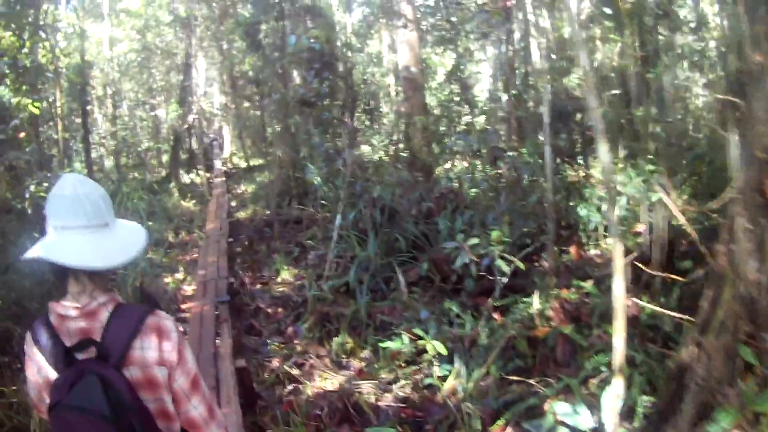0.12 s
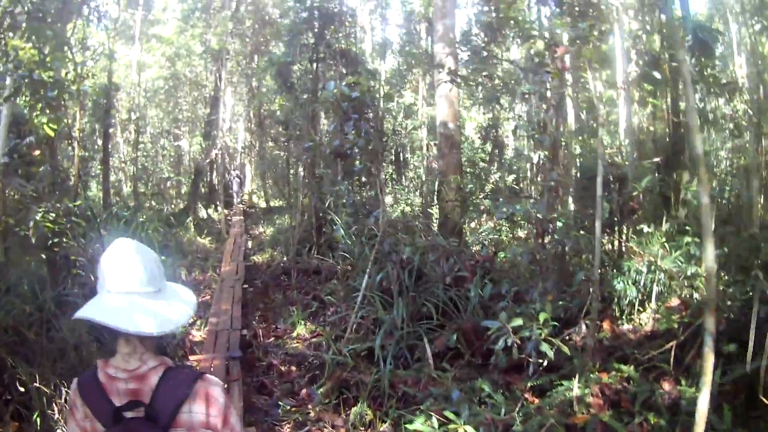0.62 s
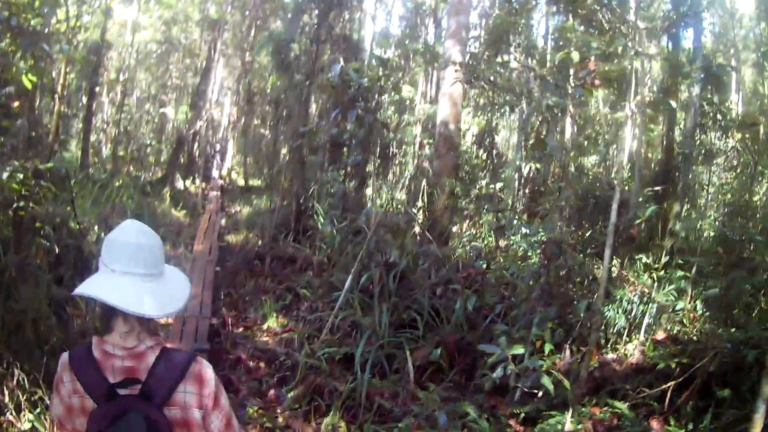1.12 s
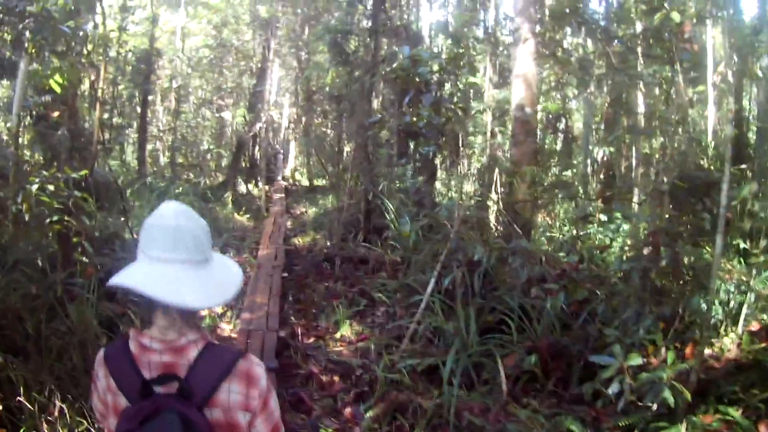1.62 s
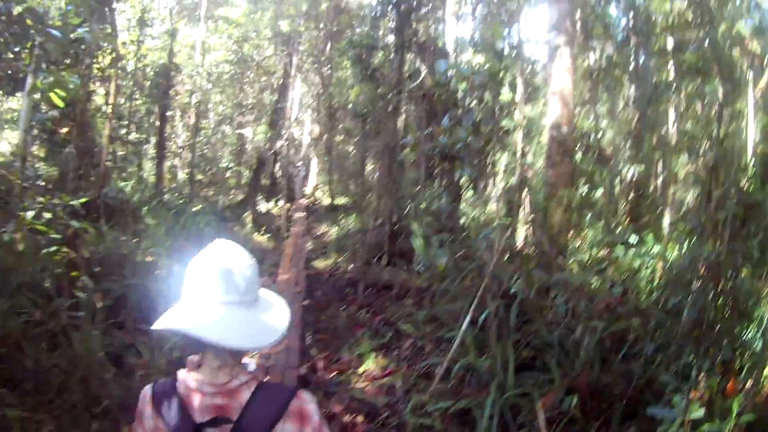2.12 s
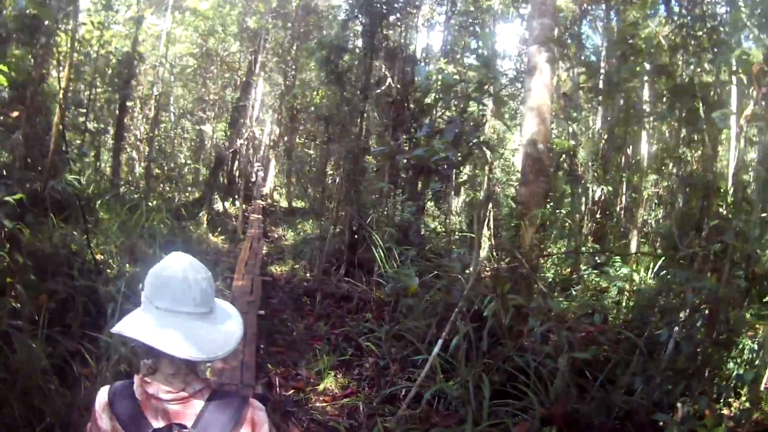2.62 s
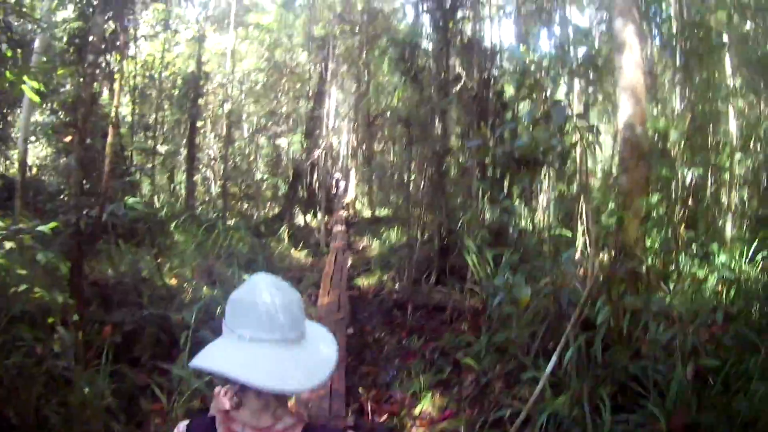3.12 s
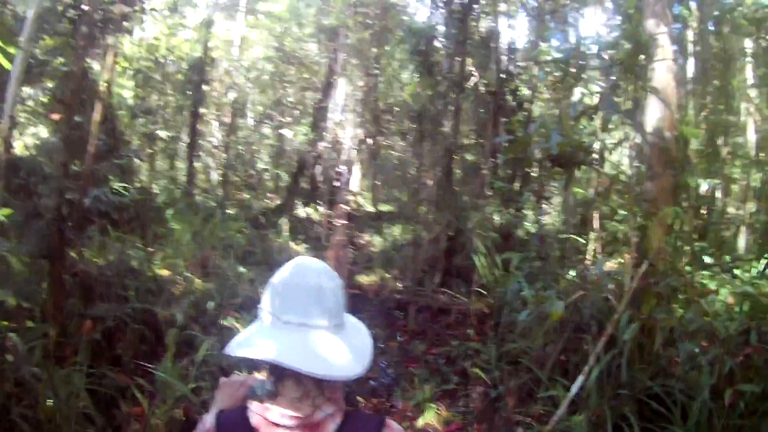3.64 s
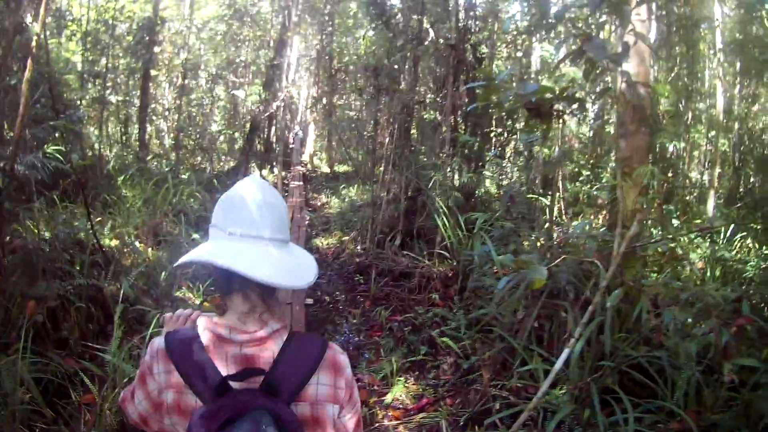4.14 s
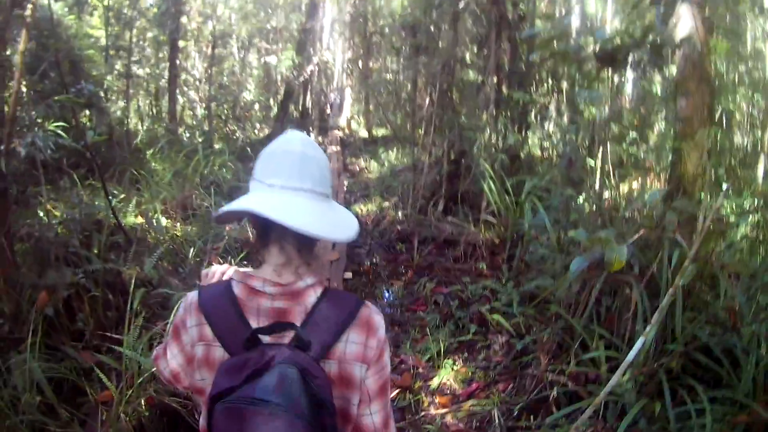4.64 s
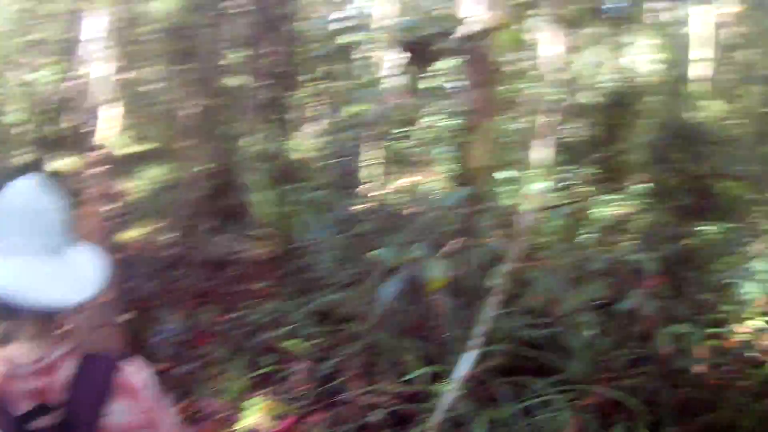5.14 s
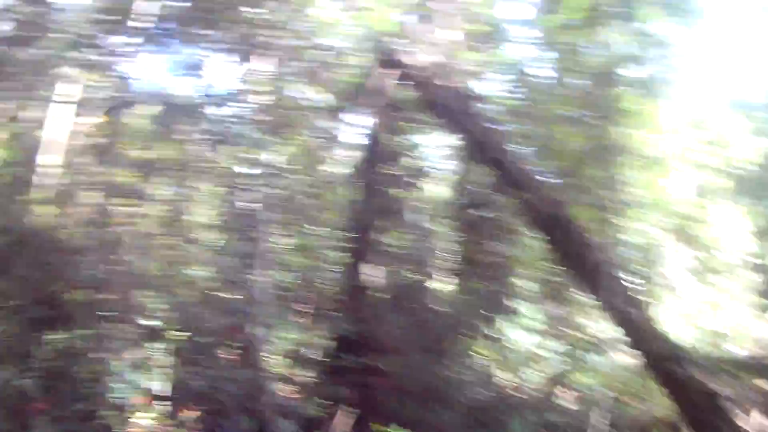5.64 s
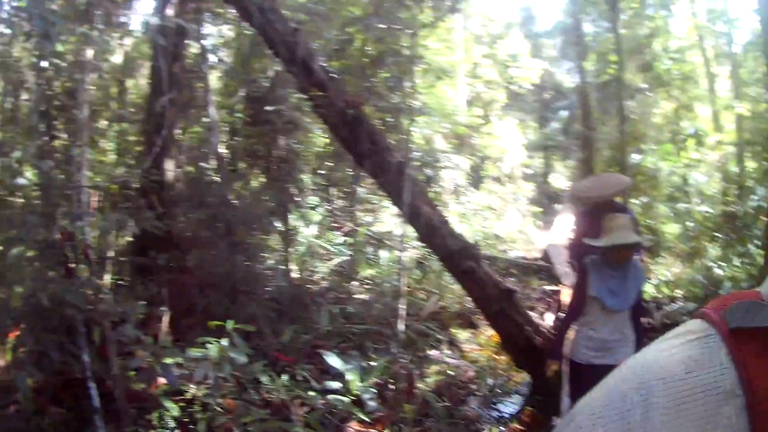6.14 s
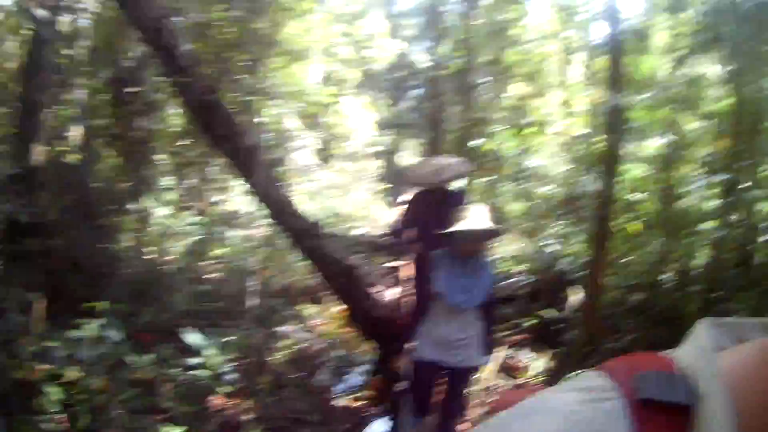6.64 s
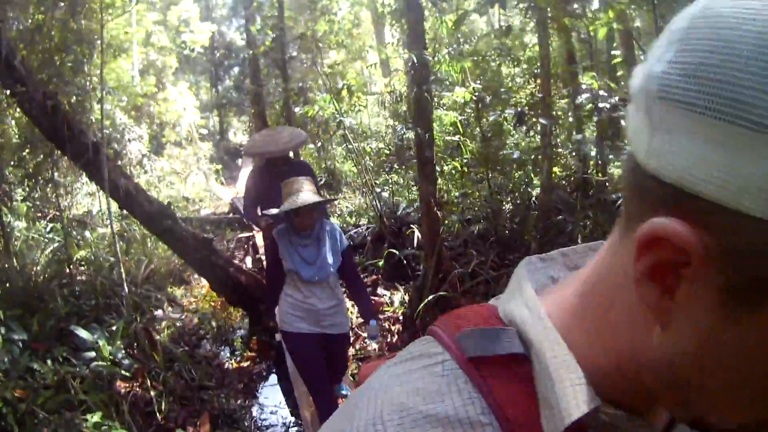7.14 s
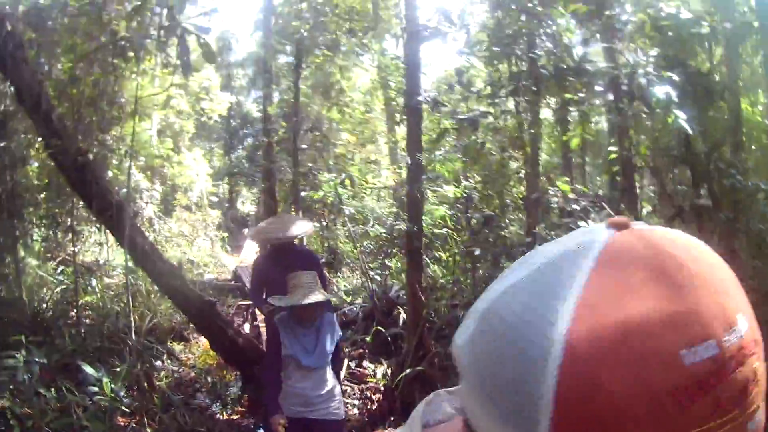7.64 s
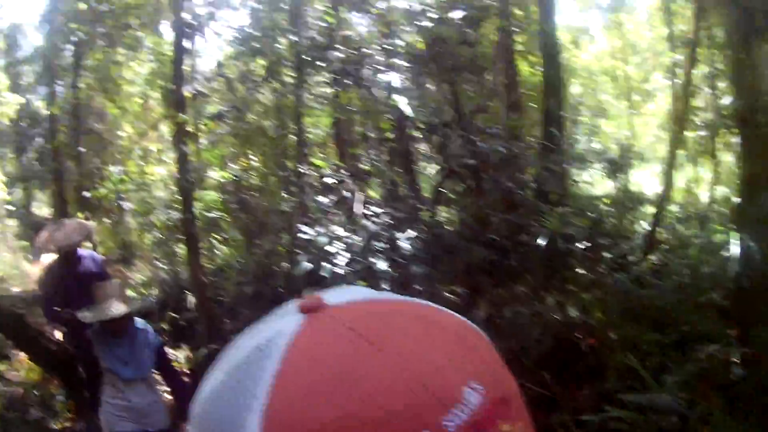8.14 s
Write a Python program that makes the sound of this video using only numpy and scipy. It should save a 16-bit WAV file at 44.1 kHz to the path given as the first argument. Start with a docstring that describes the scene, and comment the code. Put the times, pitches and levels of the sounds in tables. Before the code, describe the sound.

Very close, boxed-in mono sound, treble dulled by a closed case. Over a dim forest background, a hand slips softly and a loose plastic joint clicks irregularly, often in quick pairs. Midway, loud clunks burst out with gritty snapping, low pole thuds and scraping grip. A brief lull follows, then another stronger run of knocks and rattles, the loudest slightly crushed with a little hiss.

```python
"""A muffled forest hush and low rumble, made of coloured noise, lie under the whole scene.
Soon a hand slips on a pole carrying a small camera in a closed plastic case, and its loose joint
clicks: decaying modes of tube, case and lid, with gritty noise as the joint faces snap.
From the middle on the pole is swung round: filtered grains rub under the hand, low bending modes
sway, and the knocks grow heavy. The loudest peaks saturate; a treble noise follows the loudness."""
import sys
import numpy as np
from scipy import signal
from scipy.fft import rfft, irfft, next_fast_len
from scipy.io import wavfile
from scipy.ndimage import uniform_filter1d, map_coordinates

SR = 44100
rng = np.random.default_rng(int(sys.argv[2]) if len(sys.argv) > 2 else 0)


def gain_from_db(level_db):
    """Turn a decibel level (scalar or array-like) into a linear amplitude factor."""
    decades = np.asarray(level_db, float) / 20
    return 10 ** decades


def generate_wav(sig):
    """Save sig (samples, or channels by samples) to the path in sys.argv[1] as 16-bit PCM at SR."""
    pcm = np.round(np.clip(np.atleast_2d(sig).T, -1, 1) * 32767).astype(np.int16)
    wavfile.write(sys.argv[1], SR, pcm)


N = 364707  # length [samples]


def unit(x):
    """Scales a signal to rms 1."""
    return x / np.sqrt(np.mean(x ** 2) + 1e-20)


def along(points, hz):
    """Reads a (frequency [Hz], value) curve on a log frequency axis."""
    f, v = np.transpose(points)
    return np.interp(np.log(hz + 1), np.log(f + 1), v)


def wobble(rate):
    """A smooth random curve with `rate` knots a second."""
    knots = rng.standard_normal(int(N * rate / SR) + 4)
    return map_coordinates(knots, [np.arange(N) * rate / SR])


def filtered(x, response):
    """Multiplies the spectrum of x by a response of frequency."""
    m = next_fast_len(N + SR // 2)
    return irfft(rfft(x, m) * response(np.fft.rfftfreq(m, 1 / SR)), m)[:N]


def noise(spectrum):
    """Noise of rms 1 with the given colour."""
    white = rng.standard_normal(N)
    return unit(filtered(white, lambda hz: gain_from_db(along(spectrum, hz))))


def ringing(modes, s, level_db, attack, scatter_db, bounce_db, gap=0.00455, free_db=-60):
    """Every blow adds a ring of slightly random strength to each mode, then a rebound at a fixed ratio."""
    t = np.arange(SR // 2) / SR
    luck = rng.standard_normal((len(s), len(modes) + 1))
    start = np.round(s * SR).astype(int)
    uneven_gap = gap * gain_from_db(2.577 * luck[:, -1])
    again = start + np.round(SR * uneven_gap).astype(int)
    out = np.zeros(N)
    for (hz, db, t60), chance in zip(modes, luck.T):
        size = gain_from_db(level_db + scatter_db * chance)
        rebounds = np.bincount(again, size, N + SR)[:N]
        blows = np.bincount(start, size, N) + gain_from_db(bounce_db) * rebounds
        # light touches stay pressed and die twice as fast
        firm = np.clip(np.abs(blows) / gain_from_db(free_db), 0, 1)
        for share, life in ((firm, t60), (1 - firm, t60 / 2)):
            onset = (1 - np.exp(-t / attack)) ** 2
            ring = gain_from_db(db - 60 * t / life) * onset * np.sin(2 * np.pi * hz * t)
            out += signal.oaconvolve(blows * share, ring)[:N]
    return out


def strokes(start, end, level_db, rise, fall):
    """Gain of strokes that swell, hold and fade by straight slopes [dB/s], summed as power."""
    t = np.arange(0, N + 64, 64)[:, None] / SR
    early = np.maximum(start - t, 0)
    late = np.maximum(t - end, 0)
    gain = gain_from_db(level_db - rise * early - fall * late)
    return np.interp(np.arange(N) / SR, t[:, 0], np.sqrt(np.sum(gain ** 2, axis=1)))


# Joint contacts: (time [s], knock before the losses of each part [dB], side struck, crack [dB], push [dB])
# The side runs round a circle of three: 0 tube, 1 case, 2 lid, 3 tube again.
JOINT_CONTACTS = [(0.737, -31.5, 2, -43, -38), (0.7436, -37, 0.99, -48, -35), (0.9575, -27, 0.78, -56, -40),
                  (1.1206, -28.5, 2.33, -39, -69), (1.123, -39, 0.84, -44, -61),
                  (1.2006, -32.5, 2.91, -31.0, -31), (1.206, -30, 2.16, -62.0, -32),
                  (1.304, -42, 2.01, -53.5, -69.0), (1.4984, -26.5, 2.45, -60.0, -37),
                  (1.5441, -30.5, 0.24, -29.5, -40), (1.895, -35, 2.56, -64.0, -42.0),
                  (1.9454, -31.5, 2.26, -40.0, -34), (1.951, -26, 2.1, -38.5, -32),
                  (2.093, -24, 1.4, -32.5, -35), (2.2064, -26, 1.37, -34.5, -33),
                  (2.2112, -29.5, 1.86, -45, -31.5), (2.3723, -27, 1.24, -33.5, -45),
                  (2.454, -34, 1, -34.5, -28.5), (2.4607, -27.5, 2.3, -48, -53),
                  (2.564, -58.5, 0.21, -54, -54.0), (2.7729, -58.5, 2.21, -51, -60.0),
                  (3.0108, -55, 1.9, -50.5, -65.0), (3.0572, -26, 2.71, -28, -40),
                  (3.161, -19.5, 2.3, -44, -35.5), (3.1786, -34, 1.21, -31, -29.5),
                  (3.184, -27, 0.34, -48, -29), (3.3292, -25, 1.36, -31.0, -43),
                  (3.4344, -40, 0.75, -36.5, -40), (3.4392, -27.5, 1.24, -48, -30.5),
                  (3.4866, -41, 1.6, -68, -42), (3.708, -19, 2.17, -43.0, -32.5),
                  (3.7776, -23, 1.4, -30.5, -38), (3.937, -30.5, 2.01, -38.5, -30.5),
                  (3.9478, -30, 1.7, -52, -32), (4.039, -25.5, 1.8, -32.5, -37.5),
                  (4.147, -34, 2.01, -42, -38.5), (4.5155, -31.5, 1.23, -74.0, -43),
                  (4.59, -37, 2.45, -68.0, -36), (4.6929, -24, 2.2, -30.5, -27), (4.7163, -31, 3, -53, -27),
                  (4.7497, -27.5, 1.3, -53, -39), (4.7805, -29, 2.24, -54, -45),
                  (4.8025, -36, 2.01, -61.0, -38), (5.0499, -25, 2.6, -51.5, -26),
                  (5.107, -17.5, 0.61, -50, -27), (5.176, -15.5, 1.13, -48.0, -41),
                  (5.2724, -34, 2.01, -46, -53), (5.3192, -26, 0.16, -27.5, -24),
                  (5.3259, -16.5, 2.2, -45, -51.0), (5.38, -22, 0.65, -50.0, -32),
                  (5.3905, -24, 2.01, -42.5, -37), (5.4088, -19.5, 0.81, -53, -45),
                  (5.4484, 0.5, 1.19, -32.0, -16), (5.465, -5, 1.41, -35.0, -27),
                  (5.474, -14.5, 1.2, -48, -33), (5.4883, -27, 2.1, -34, -26), (5.4983, -30.0, 2, -44, -31),
                  (5.5102, -13.5, 2.5, -56, -25), (5.5208, -15, 1.01, -51, -49.0),
                  (5.5395, -19.5, 0.31, -65.0, -52), (5.574, -12, 1.68, -38.5, -33),
                  (5.6448, -7, 1.26, -41.0, -34), (5.6552, -5.5, 1.55, -29.5, -17),
                  (5.8284, -11.5, 1.4, -49.0, -32.0), (5.8484, -9, 1.3, -38.5, -22.5),
                  (5.8664, -34.5, 1.91, -39, -35), (5.913, -31, 0.51, -65.0, -32),
                  (5.9455, -26, 1.01, -32, -36), (6.1486, -33, 0.01, -61, -30),
                  (6.1936, -22, 1.05, -57.0, -33), (6.2388, -25.5, 2.06, -32, -39.0),
                  (6.3493, -25.5, 0.41, -27.5, -25), (6.5982, -28, 1.01, -74.0, -49),
                  (6.6134, -33, 0.26, -27.5, -50), (6.6358, -13, 1.72, -48, -28.5),
                  (6.6646, -14.5, 0.01, -54.5, -24), (6.6841, -36.5, 0.81, -37.0, -51),
                  (6.7025, -20, 0.76, -56.5, -28.5), (6.7451, 0.5, 1.23, -23, -31.0),
                  (6.7629, -7.5, 0.65, -28.5, -25), (6.771, -28, 0.81, -34.5, -23),
                  (6.7945, -0.5, 2.62, -25, -16.0), (6.8068, -14, 0.58, -40.0, -24),
                  (6.8132, -16, 0.01, -49, -23.5), (6.9288, -13.5, 1.9, -51, -28),
                  (6.9493, -27.5, 0.26, -30, -40), (7.0049, -12.5, 2.49, -39, -31),
                  (7.0308, -34.5, 2.01, -59.5, -47.0), (7.2448, -25.5, 0.46, -59.0, -36.5),
                  (7.317, -17, 0.4, -69, -18.5), (7.3502, -25.5, 2.01, -31, -22.5),
                  (7.4014, -33.0, 3.7, -42, -24.0), (7.4071, -3.5, 2.52, -28.5, -27),
                  (7.5409, -9, 2.26, -34.5, -29.5), (7.5622, -24.0, 2.4, -38.5, -45.0),
                  (7.5858, -20, 0.8, -72, -27), (7.612, -29, 2.71, -68, -27.5),
                  (7.6287, -21.5, 0.71, -27.0, -29), (7.7146, -18.5, 0.7, -42, -17),
                  (7.726, -3.5, 2.47, -31.5, -23), (7.8781, -6.5, 1.34, -35, -24.5),
                  (7.9399, -15.5, 0.32, -28, -15), (7.9478, -13.5, 1.01, -31, -36),
                  (7.9513, -3.5, 2.51, -29.5, -24.0), (7.987, -17.5, 0.51, -67.0, -31.0),
                  (7.9922, -22, 0.01, -66.0, -24), (8.0433, -32, 2.66, -23.5, -45),
                  (8.059, -6.5, 2.91, -27.5, -46), (8.0639, -10.5, 3.02, -63.0, -30),
                  (8.1072, -16, 2.4, -46.5, -44), (8.1555, -35, 2.26, -41.5, -60),
                  (8.198, -32, 0.13, -36.5, -30.5), (8.2242, -21.5, 0.01, -59, -44),
                  (8.2415, -18, 1.71, -44, -31), (8.259, -38.0, 0.41, -60.0, -21.5)]
# Modes of each part: (frequency [Hz], relative level [dB], decay by 60 dB after a firm blow [s])
PUSH_MODES = [(390, -0.5, 0.013), (495, -6.5, 0.018), (288.5, 2, 0.012)]
TUBE_MODES = [(796.8, -5.5, 0.036), (836.2, -13, 0.043)]
CASE_MODES = [(1048, -32, 0.026), (1185, 0.5, 0.029), (1243, -1, 0.026)]
LID_MODES = [(1446, -3, 0.017), (1512, 3.5, 0.009), (1720, -15.5, 0.008)]
FACE_MODES = [(388, -6, 0.023), (1357, -31, 0.25), (1815, -1, 0.013), (2213, -2.5, 0.012),
              (3343, -11, 0.01), (4340, -10.5, 0.0097), (5060, -6.5, 0.0063), (6690, -17.5, 0.005),
              (9600, -15, 0.0036)]
LONG_TUBE_MODES = [(830, -31, .45), (1200, -37, .2)]
# Colour of the joint's grit: (frequency [Hz], relative density [dB per Hz])
GRIT_COLOUR = [(700, -2), (1500, 4.5), (2350, -2.5), (2900, -10), (4300, -6), (5400, -13.5), (6300, -23.5),
               (9000, -31), (12000, -28.5)]


def joint():
    """Dull knocks ring tube, case and lid; hard contacts snap the joint faces amid gritty noise."""
    s, knock_db, side, crack_db, push_db = np.transpose(JOINT_CONTACTS)
    part = np.arange(3)[:, None]
    away = np.abs((side - part + 1.5) % 3 - 1.5)  # the shorter way round the circle
    reach_db = np.array((-4, -4, 0.2))[:, None]  # tube, case, lid struck square on
    tube_db, case_db, lid_db = knock_db + reach_db - 9 * away  # loses 9 dB per side
    body = ringing(PUSH_MODES, s, push_db, attack=0.0016, scatter_db=6.0, bounce_db=-4.0)
    body += ringing(TUBE_MODES, s, tube_db, attack=0.0005, scatter_db=2.2, bounce_db=-3, free_db=-20.0)
    body += ringing(CASE_MODES, s, case_db, attack=0.0012, scatter_db=1.5, bounce_db=-9.0, free_db=-21)
    body += ringing(LID_MODES, s, lid_db, attack=0.0012, scatter_db=3.5, bounce_db=-7, free_db=-29.5)
    body += ringing(FACE_MODES, s, crack_db, attack=0.00054, scatter_db=2.5, bounce_db=-2.5, gap=.0024)

    firm_db = 1.3 * tube_db  # favours firm knocks: the metal tube barely rings on after light ones
    long_ring = ringing(LONG_TUBE_MODES, s, firm_db, attack=0.0055, scatter_db=2.0, bounce_db=1.5)
    body += gain_from_db(2.5 * wobble(40)) * long_ring  # the hand damps the tube unevenly

    t = np.arange(-SR // 20, SR // 20) / SR
    settle = gain_from_db(-6.0 - 60 * t / 0.022) * (t > 0)
    halo = gain_from_db(-21.5 - 60 * np.abs(t - .004) / 0.084)  # a faint treble noise halo on both sides of each snap
    blows = np.bincount(np.round(s * SR).astype(int), gain_from_db(crack_db), N)
    grit_gain = signal.fftconvolve(blows, settle + halo, "same")
    chatter = gain_from_db(5.45 * wobble(600))  # many tiny touches
    return body + grit_gain * unit(chatter * noise(GRIT_COLOUR))


# Jolts that bend the pole: (time [s], drive of the lower modes [dB], drive of the upper modes [dB])
POLE_JOLTS = [(4.70, -43, -42), (5.11, -31, -24.5), (5.167, -31, -26.5), (5.314, -40, -34.5),
              (5.376, -36.5, -25.5), (5.454, -24, -23), (5.509, -40, -33), (5.568, -28, -53),
              (5.606, -28.5, -46), (5.655, -19.5, -28), (5.85, -29, -39.5), (5.979, -35, -60),
              (6.145, -38, -30.5), (6.191, -34, -34.5), (6.427, -34.5, -30.5), (6.5, -46, -21),
              (6.567, -37, -40), (6.664, -19.5, -26.5), (6.748, -17.5, -39), (6.77, -16, -27),
              (6.795, -18.5, -16.5), (6.841, -22, -27), (6.93, -34, -49), (7, -33.5, -41),
              (7.241, -38, -33.5), (7.316, -22, -22.5), (7.372, -22.5, -21), (7.424, -28, -29),
              (7.542, -27.5, -40), (7.62, -29.5, -32), (7.711, -20, -23.5), (7.895, -22, -34),
              (7.945, -22.5, -17.5), (7.991, -20, -16.5), (8.056, -25, -29), (8.115, -30.5, -43),
              (8.252, -36.5, -33)]


def pole():
    """Each jolt and small tremor rings two groups of low bending modes, damped by the hand."""
    tremors_per_s = 40
    shake_s = np.sort(rng.uniform(0, N / SR - .01, round(tremors_per_s * N / SR)))
    drag = swinging()[np.round(shake_s * SR).astype(int)]
    drag_db = 20 * np.log10(drag + 1e-9)
    tremors = np.transpose([shake_s, drag_db + 6, drag_db + 8.5])  # as strong as the swing of the moment
    s, lower_db, upper_db = np.transpose(np.vstack([POLE_JOLTS, tremors]))
    # modes: (frequency [Hz], relative level [dB], decay by 60 dB [s])
    lower_modes = [(95.1, 2.5, 0.17), (45, -3, 0.04), (132.5, -10, 0.18), (77, -9.5, 0.2)]
    upper_modes = [(262.5, 1.5, 0.068), (242, -6.5, 0.052), (177.0, -8, 0.11)]
    lower = ringing(lower_modes, s, lower_db, attack=0.0026, scatter_db=2.5, bounce_db=-6.5)
    lower *= gain_from_db(2.4 * wobble(70))  # the low sway wavers randomly in strength
    upper = ringing(upper_modes, s, upper_db, attack=0.0069, scatter_db=2.0, bounce_db=-3)
    # a high-pass thins the sway below about 35 Hz
    return filtered(lower + upper, lambda f: (1j * f / (35 + 1j * f)) ** 2)


# Swings of the pole, with the hand dragging on the grip: (start [s], end [s], level [dB])
POLE_SWINGS = [(4.704, 4.786, -54), (5.004, 5.17, -46.5), (5.252, 5.62, -50), (5.673, 5.94, -51),
               (6.162, 6.302, -52), (6.454, 6.82, -49), (7.3, 7.69, -58), (7.848, 8.127, -54.5)]


def swinging():
    """How hard the hand drags while the pole swings: a gain with steep flanks."""
    return strokes(*np.transpose(POLE_SWINGS), rise=308, fall=359)


# Sudden slips of the hand: (time [s], length [s], level [dB])
HAND_SLIPS = [(0.623, .005, -59.5), (0.71, .025, -59.5), (.905, 0.023, -63.5), (1.486, .005, -56),
              (3.635, 0.022, -58), (4.474, .005, -58), (4.715, .005, -48), (5.168, .012, -41),
              (5.551, .005, -38.5), (5.973, 0.016, -36), (6.035, 0.029, -45), (6.46, .005, -44.5),
              (6.5, .04, -36.5), (6.77, .02, -41.5), (7.06, .004, -55.5), (7.22, .004, -54.5),
              (7.848, 0.036, -46.5), (8.009, .01, -45), (8.24, .03, -45.5)]
# Case modes under the rubbing hand: (frequency [Hz], width [Hz], relative level [dB])
RUBBED_MODES = [(91.5, 46, -0.5), (260, 100, -3), (480, 180, -7), (796, 78, -3.5), (1190, 160, 0),
                (1447, 200, -5.5), (1764, 130, -11), (4300, 600, -4.5)]


def grip():
    """Skin catches and slips in uneven small grains that excite the case."""
    grains = rng.standard_normal(N) * gain_from_db(3.2 * wobble(300) + 1 * wobble(45))

    def muffled_case(f):
        """Resonances of alternating sign behind a wall that dulls the treble."""
        modes = 0
        for k, (centre, width, db) in enumerate(RUBBED_MODES):
            damping = 1j * f * width
            modes = modes + (-1) ** k * gain_from_db(db) * damping / (centre * centre - f * f + damping)
        leak = .06  # share of the treble that gets past the case wall
        return modes * (leak + 1 / (1 + (f / 1930) ** 12))

    s, length, slip_db = np.transpose(HAND_SLIPS)
    drag = swinging() * gain_from_db(2.5 * wobble(16))
    slips = strokes(s, s + length, slip_db, rise=750, fall=750)
    return np.hypot(drag, slips) * unit(filtered(grains, muffled_case))


# Colour of the forest hush: (frequency [Hz], relative density [dB per Hz])
HUSH_COLOUR = [(15, -21.5), (25, 1), (60, -1), (100, -3), (200, -7), (400, -13), (800, -18), (1680, -24.5),
               (4300, -31.5), (6500, -33), (12000, -36)]


def forest():
    """The far, muffled hush of the trail is steady noise over an uneven low rumble."""
    hush = gain_from_db(-61.0) * noise(HUSH_COLOUR)
    rumble_colour = [(15, -20), (30, 0), (100, -3), (250, -12), (500, -40)]
    rumble = gain_from_db(-70 + 3 * wobble(9)) * noise(rumble_colour)
    return hush + rumble


def scene():
    """Joint, pole, grip and forest sum to one channel."""
    return (joint() + pole() + grip() + forest())[None]


def band_limit(x):
    """A steep low-pass at the top of the band."""
    return signal.sosfilt(signal.butter(12, 12370, fs=SR, output="sos"), x)


# Colour of the level-following noise: (frequency [Hz], relative density [dB per Hz])
FOLLOWING_NOISE_COLOUR = [(1500, -32), (3000, -0.5), (5500, -2.5), (6500, -17.5), (8000, -3.5),
                          (12000, -5.5)]


def record(dry):
    """Strong peaks saturate softly, a treble noise rises and falls with the loudness, the top is cut."""
    loudness = np.sqrt(np.abs(uniform_filter1d(dry[0] ** 2, 1400)))  # rms over 1400 samples
    squeezed = dry[0] / (1 + np.abs(dry[0] / .5) ** 4) ** .25  # never passes 0.5
    noisy = squeezed + gain_from_db(-37.5) * loudness * noise(FOLLOWING_NOISE_COLOUR)
    mix = filtered(noisy, lambda hz: hz < 12050)[None]
    return band_limit(mix)


dry = scene()
out = record(dry)
generate_wav(out)
```